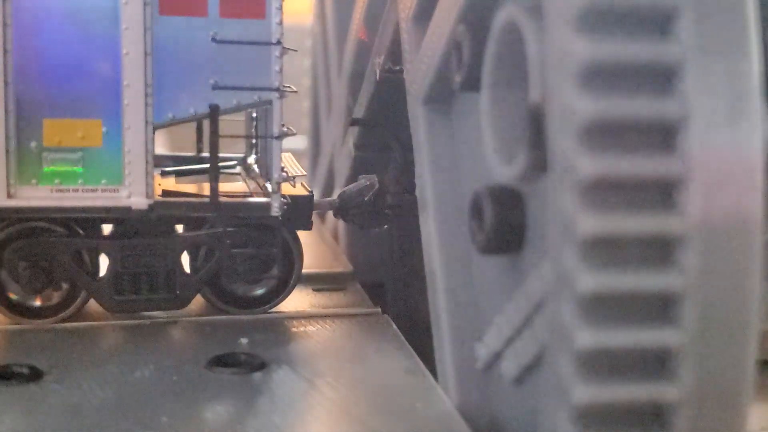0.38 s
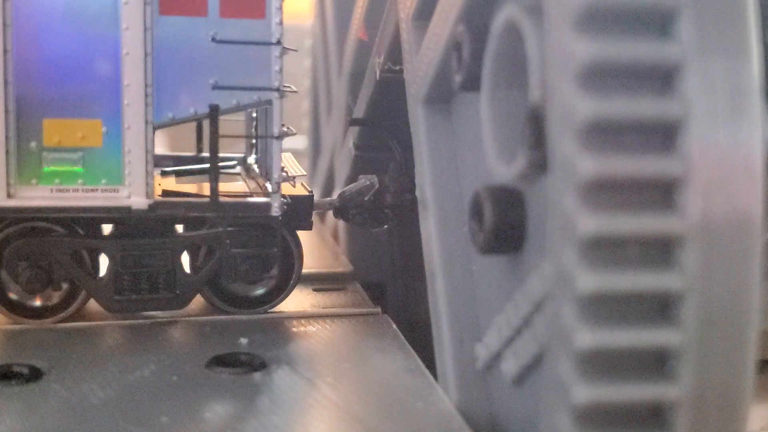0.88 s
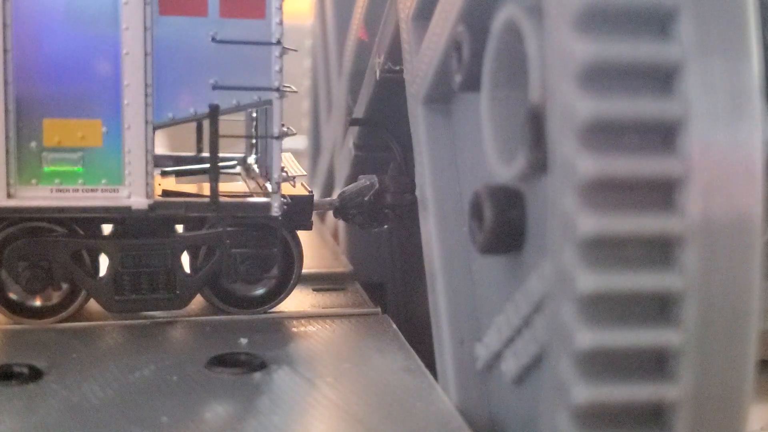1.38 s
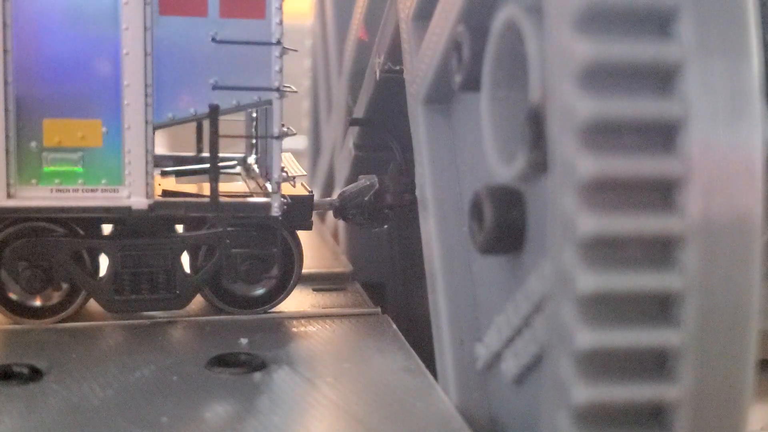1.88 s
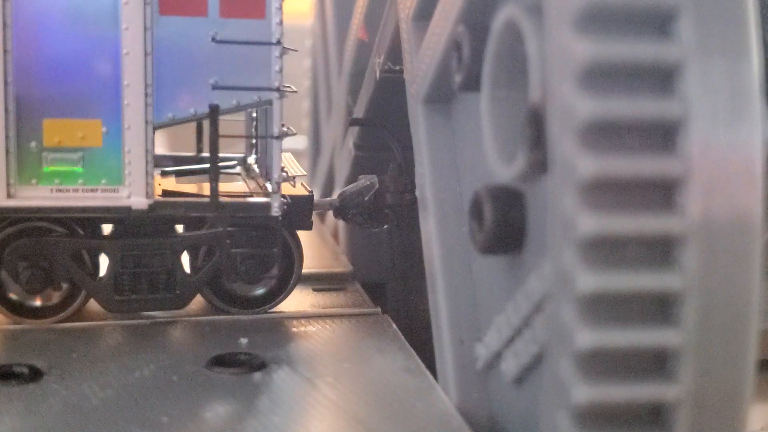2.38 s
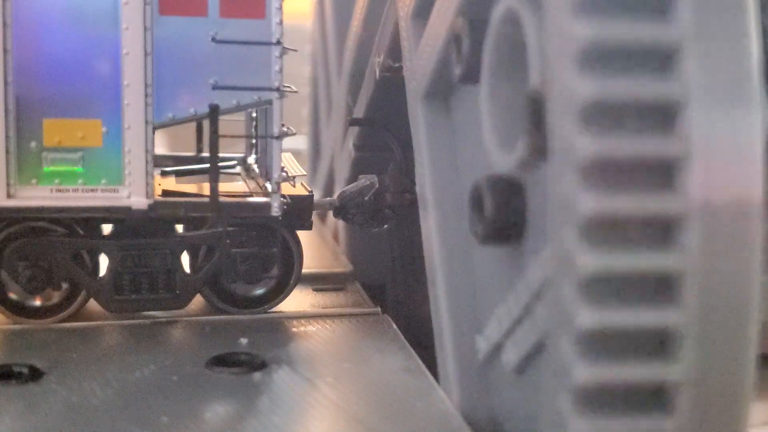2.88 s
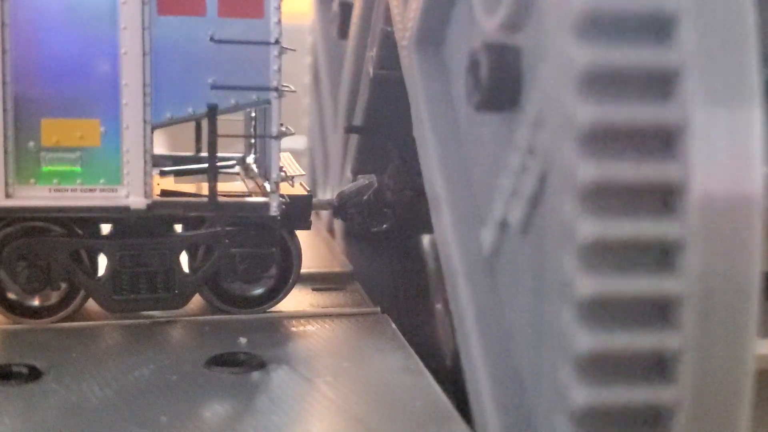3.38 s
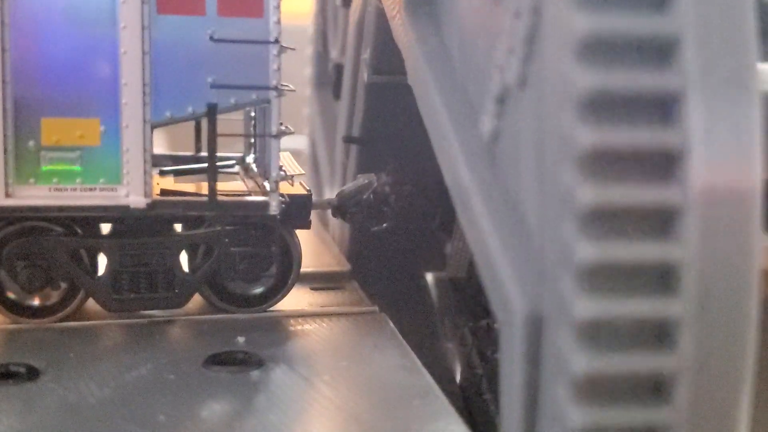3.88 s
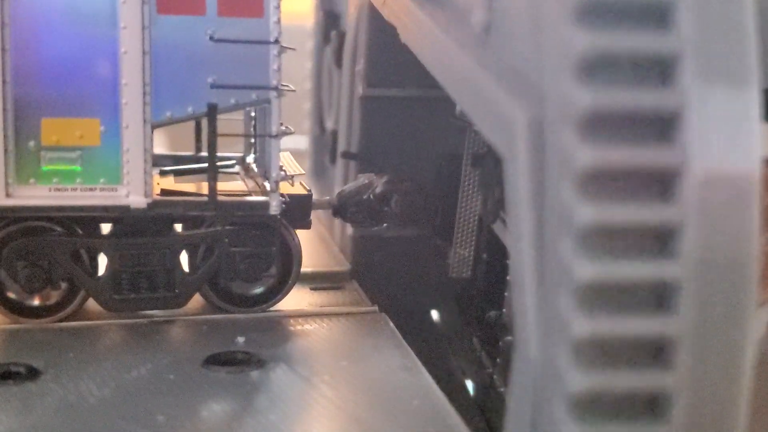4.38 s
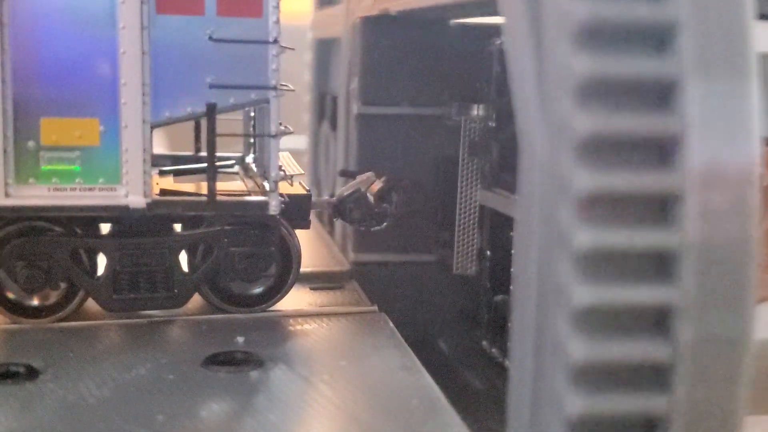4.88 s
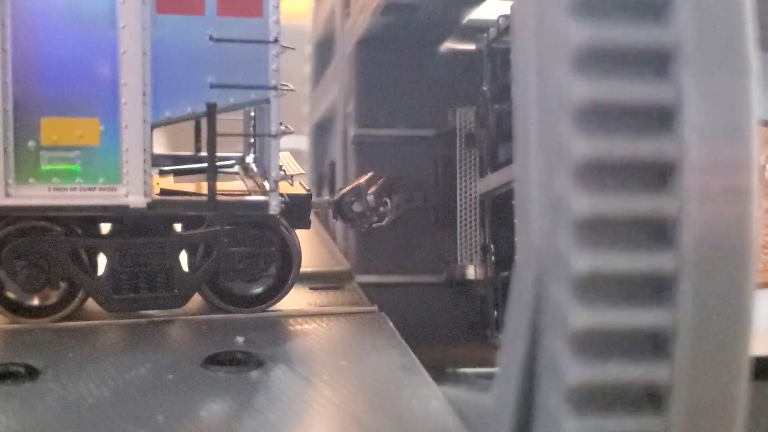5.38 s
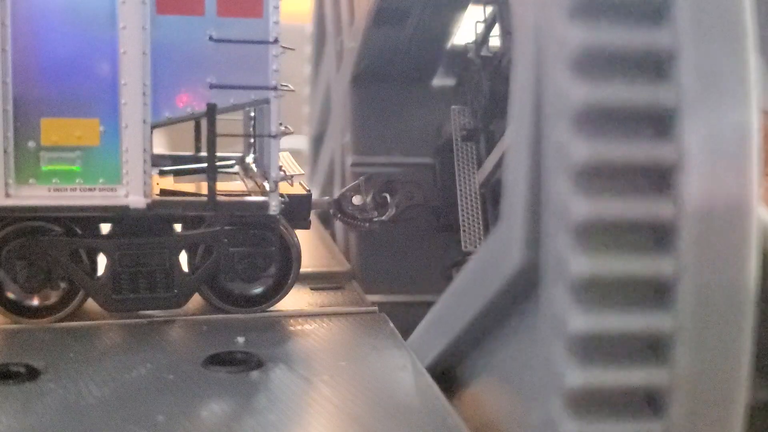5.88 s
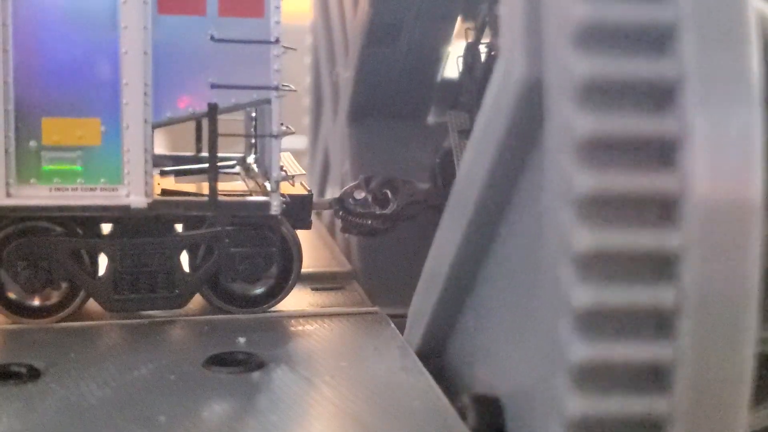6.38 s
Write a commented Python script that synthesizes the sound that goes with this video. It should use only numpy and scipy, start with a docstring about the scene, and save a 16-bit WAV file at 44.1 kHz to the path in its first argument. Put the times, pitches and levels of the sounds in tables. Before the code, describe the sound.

Close stereo view of a plastic model car dumper on a table in a quiet room. Faint distant machine hum and soft air, with scattered crisp plastic ticks, last nearly three seconds. Then a small motor starts almost instantly with a short gear chatter and holds a harsh, steady, high whine with bright rubbing hiss, low tooth-by-tooth thumps and light rattling. One harder knock comes about a second later. It is still running at the end.

```python
"""Geared motor turning a model car dumper

A small geared motor turns a plastic model car dumper on a table in a quiet room.
At first only a far machine hums (narrow wavering tones), over airy noise, and plastic ticks (struck modes).
Then the ten-tooth pinion whines up to speed (tones locked to the shaft) with bright rubbing hiss,
the ring gear thumps the table tooth by tooth (struck low modes), loose parts rattle in the drum
and the car knocks once against its clamp, the hardest of many small knocks (struck modes)."""
import sys
import numpy as np
from scipy import signal
from scipy.fft import rfft, irfft, next_fast_len
from scipy.io import wavfile

SR = 44100
rng = np.random.default_rng(int(sys.argv[2]) if len(sys.argv) > 2 else 0)


def rack_gain(trim_db):
    """Turn a fader trim in dB into the linear factor to multiply a signal by."""
    fader = np.asarray(trim_db, float)
    return 10 ** (fader / 20)


def wrap_up_sound(samples):
    """Save the sound to the file named by the first command line argument, as 16-bit audio."""
    columns = np.atleast_2d(samples).T
    # keep every value between -1 and 1, then stretch to whole-number steps
    tamed = np.clip(columns, -1, 1)
    steps = np.round(tamed * 32767).astype(np.int16)
    wavfile.write(sys.argv[1], SR, steps)


N = 287532

# All table levels are relative: gains, swells and trims in the functions come on top.
# tones of the ten-tooth mesh, 1st to 6th, at half turn: (left level/dB, right level/dB, left lead/rad)
MESH_TONES = [(-51.5, -56, -1.96), (-45.5, -50, -1.47), (-32.5, -37.5, 0.62), (-48, -47.5, 1.57),
              (-40, -55, -1.1), (-42.5, -68, 0.58)]
# other tones of the gear train: (multiple of shaft speed, left level/dB, right level/dB, left lead/rad)
GEAR_TONES = [(1, -59, -59, 0.5), (3, -64, -70, 0.4), (4, -63, -66, 0.9), (9, -61, -70, -2.8),
              (18, -64, -71, -0.7), (19, -59, -64, -1.4), (21, -58, -57, -0.0), (22, -63, -64, -0.2),
              (23, -55, -59, 2.9), (24, -62, -66, 3.0), (25, -50, -64, 0.8), (27, -56, -67, -0.1),
              (28, -55, -60, -0.8), (29, -42, -44, 0.2), (31, -45, -48, 3.1), (32, -56, -64, 2.3),
              (33, -61, -64, 2.8), (39, -56, -66, -2.3), (42, -63, -66, 2.1), (43, -64, -63, 2.0),
              (45, -60, -64, 1.0), (47, -61, -62, -0.2), (48, -53, -55, 0.3), (49, -48, -54, 1.0),
              (51, -52, -64, -0.9), (53, -54, -72, -2.9), (55, -56, -78, 1.5), (58, -52, -73, 0.1),
              (59, -50, -67, -1.3), (61, -52, -68, 0.8), (62, -63, -67, 0.2), (63, -65, -73, 2.1),
              (69, -60, -59, 0.4), (70, -55, -62, 0.7), (71, -65, -66, 1.0), (78, -65, -65, -1.3),
              (80, -54, -59, -2.5), (81, -54, -57, -1.3), (82, -58, -59, -1.4), (83, -59, -64, -0.6),
              (84, -55, -63, 0.9), (87, -62, -68, 0.4), (90, -51, -68, 2.5), (91, -48, -67, 1.8),
              (92, -52, -66, -3.1), (98, -58, -71, -2.0), (101, -52, -63, -2.9), (102, -51, -58, -2.6),
              (103, -52, -62, 3.1), (104, -47, -53, -2.6), (106, -49, -67, -0.6), (107, -54, -63, -2.0),
              (108, -42, -62, -2.5), (109, -48, -64, -2.9), (110, -51, -63, 1.8), (111, -50, -58, -2.7)]
# resonances of the gearbox case, which colour the tones: (f/Hz, level/dB)
CASE = [(600, -40), (1400, -8), (2800, -11), (3100, -9), (3500, -8.5), (4200, -5), (5000, -26.5),
        (5600, -30.5), (7000, -16.5), (8500, -22), (10500, -34), (16000, 13)]
# shaft wobble at the beats of the next wheel: (multiple of shaft speed, shaft angle/rad)
WOBBLE = [(.2, .014), (.4, .008), (.8, .003)]
# shaft speed trend: (speed at half turn/(turns/s), slope/(turns/s per s), curve/(turns/s per s^2))
SHAFT_SPEED = (141.04, .172, -.026)
# uneven binding of the drive wheel, once, twice and three times a turn of it:
# (swing/(turns/s), phase/rad) each
SHAFT_SWING = (.17, 0.0, .12, .6, .07, -1.3)
# shading of each mesh tone by the turning drum:
# (left slope/(dB/s), left curve/(dB/s^2), right slope/(dB/s), right curve/(dB/s^2))
SHADE = [(0.94, -0.33, 5, -1.3), (-1.5, -1.35, -1.2, -1.2), (-0.74, -0.4, 3.16, -1), (0.6, 0, 1.68, -1.2),
         (1.5, -2.1, -0.5, 3.5), (1.3, -1.1, -9, -22)]
# swell of each mesh tone, once and twice a turn of the drive wheel:
# (once level/dB, phase/rad, twice level/dB, phase/rad)
SWELL_LEFT = [(5.5, -0.36, 1.2, 0.3), (4, 3, 1.4, 3), (1.3, 2, 0.8, 1.5), (1.1, -1.5, 3, -1.7),
              (2, -3.5, -0.2, -3.5), (6, -3.0, 0.4, -8)]
SWELL_RIGHT = [(1.9, -0.7, 0.55, -0.8), (3.4, -0.5, 2.6, -1.1), (1.8, 2.5, 0.56, 1.5), (2.7, 0.6, 0.87, -3),
               (1.5, -1.5, 0.4, 8), (0.9, -6, 1.5, 2.2)]
# hiss of uneven tooth contacts round the upper mesh tones:
# (multiple of shaft speed, left level/dB, right level/dB, noise corner f/Hz)
TOOTH_HISS = [(59.5, -51, -68, 120), (69.6, -57, -61, 100), (80.2, -49, -51, 150), (90.1, -43, -59, 170),
              (100.5, -50, -63, 200), (104, -51, -59, 130), (108.3, -47, -61, 200)]
# sliding teeth and brushes, left row and right row:
# (level at half turn/dB, slope/(dB/s), curve/(dB/s^2))
RUB_LEVEL = [(-30, 1.28, -0.55), (-44, 0.7, 0.2)]
# their swell with the drive wheel: (once level/dB, phase/rad, twice level/dB, phase/rad)
RUB_SWELL = [(.4, 0.8, 0.25, 1.3), (1.2, 1.7, 0.8, 1.5)]
# spectrum of the rubbing: (f/Hz, density level/dB)
RUB_COLOUR = [(1400, -19), (2300, -24), (3000, -14), (3650, -14), (3900, -5), (4200, 2), (4620, -9),
              (4950, -60), (5250, -11), (6200, -13), (6800, -8), (8200, -9.5), (9100, -17), (10800, -16),
              (11400, -7), (12150, -10), (12900, -1), (13700, -9), (14300, -2), (15900, 0.5)]
# stereo balance of the rubbing: (f/Hz, left over right level/dB)
RUB_BALANCE = [(600, -26), (1400, -3), (3100, 0), (6800, -1.5), (8000, -2.5), (9100, 4), (10500, -1),
               (11300, -4), (12800, 0), (15000, 0)]
# likeness of left and right in the rubbing: (f/Hz, likeness, 1 = the same)
RUB_LIKENESS = [(900, 1), (3300, .5), (6000, 0.55), (9000, 0.56), (12000, 0.51), (15000, 0.62)]
# ring gear thumps, one strength for each tooth of the drive wheel: (level/dB)
TOOTH_DB = [-41, -36.5, -43, -38.5, -41, -45.5, -46.5, -45, -40.5, -47.5, -46.5, -41]
# jolts of the whole frame: (t/s, level/dB)
JOLTS = [(2.986, -45), (3.656, -30.5), (3.885, -40)]
# resonances of the table: (f/Hz, level/dB, t60/s)
TABLE = [(64.5, -11.5, 0.86), (112.2, 0.5, 0.25), (212, -13.5, 0.44), (356, -13.5, 0.09)]
# knocks in the turning drum: (t/s, level/dB, left over right level/dB)
KNOCKS = [(2.9826, -46, 3), (3.16, -46.5, 2.0), (3.257, -45.5, 16), (3.6235, -45, -3), (3.6463, -26.5, 6),
          (3.8836, -42, 0), (3.9918, -47, -11), (4.1026, -43.5, -3), (4.514, -42.5, -4), (4.597, -41, 10),
          (4.6454, -44, -4), (4.7322, -46, -6), (4.764, -38, -4), (5.099, -46.5, -5), (5.1885, -44.5, 7),
          (5.2925, -39.5, 4), (5.7222, -43, -5), (6.1854, -45, 24), (6.3674, -40.5, 0.5), (6.4688, -44, -5)]
# resonances of the drum: (f/Hz, level/dB, t60/s)
DRUM_MODES = [(480, -11, .035), (800, -9, .02), (1174, -5, .018), (1500, -3, .018), (1787, -3, .022),
              (1990, -3, .02), (2400, -4, .016), (2750, -6, .015), (3400, -5, .012), (4700, -7, .008)]
# plastic ticks: (t/s, level/dB, left over right level/dB)
TICKS = [(0.2778, -52, 2), (0.4988, -41, 6), (0.6387, -52, 5), (0.6776, -48.5, -1), (0.7781, -41.5, 7.5),
         (0.838, -54.5, 1), (0.9583, -45.5, 7), (1.0208, -45, 8), (1.3984, -41, 4.5), (2.1976, -53.5, 8),
         (2.2984, -43.5, 5), (2.496, -55, -2), (2.6787, -39, 4.5)]
# resonances of the ticking plastic: (f/Hz, level/dB, t60/s)
PLASTIC = [(1400, -18, .015), (2050, -8, .02), (2500, -5, .018), (2960, -6, .02), (3300, 0, .022),
           (3700, -1, .018), (4100, -7, .012), (4900, -8, .012), (5800, -13, .01), (7500, -19, .006),
           (11000, -26, .004), (14000, -25, .003)]
# tones of the far machine: (f/Hz, level/dB, waver corner f/Hz)
HUM = [(89.2, -69.5, 1.3), (120.5, -71.5, 2.6), (205.6, -59.5, 2.5), (228.5, -64, 9.2), (351, -77.5, 2.1),
       (454, -73, 1.5), (570, -83, 6), (810, -76.5, 0.57), (825.4, -73, 1.9), (885, -118, 0.8),
       (950, -91, 0.81), (1206, -89.5, 0.78), (1238, -80, 7.2)]
# spectrum of the background air: (f/Hz, density level/dB)
AIR = [(18, -41), (28, 1), (100, -4), (160, -15), (215, -1), (400, -10), (700, -15.5), (1000, -21),
       (2000, -32.5), (2600, -34.5), (7200, -44.5), (8000, -34), (8800, -56), (12000, -47.5), (15900, -44)]
# stereo balance of the air: (f/Hz, left over right level/dB)
AIR_BALANCE = [(60, -4.5), (180, -2), (550, 2), (1650, -7.5), (4970, 3), (15000, 5.5)]
# likeness of left and right in the air: (f/Hz, likeness, 1 = the same)
AIR_LIKENESS = [(60, 0.87), (180, 1), (550, 0.24), (1650, -0.75), (4970, 0.23), (15000, 0.01)]

SWITCH_ON_S, RUN_UP_S = 2.771, .032     # motor on; time constant of its run-up
CONTACT_S, BITE_S = 2.781, 0.033        # slack in the gears closes; time constant of the rubbing's onset
HALF_TURN_S = 4.7                       # drum half way round
TEETH_PER_S, DRIVE_TEETH = 9.2, 12      # ring gear teeth; teeth of the wheel that drives it
FIRST_TOOTH_S = 3.011


def rms_one(x):
    """Scales to unit rms."""
    return x / np.sqrt(np.mean(np.abs(x) ** 2) + 1e-20)


def sides(pan_db):
    """Left and right gains for a left-over-right balance."""
    return rack_gain(np.array([pan_db / 2, -pan_db / 2]))


def log_interp(hz, table):
    """Reads a table of (f/Hz, value) along log frequency."""
    table_hz, values = np.transpose(table)
    return np.interp(np.log(hz), np.log(table_hz), values)


def drift(rate_hz, channels=1):
    """Slow random motion: noise twice through a one-pole low-pass, already run in, rms 1."""
    r = np.exp(-2 * np.pi * rate_hz / SR)
    slow = signal.lfilter([1], [1, -2 * r, r * r], rng.standard_normal((channels, N + SR)))
    return rms_one(slow[:, SR:])


def rise(start_s, time_s):
    """Zero before the start, then closing exponentially on one."""
    return 1 - np.exp(-(np.arange(N) / SR - start_s).clip(0) / time_s)


def over_turn(trend, swing):
    """A quantity that drifts as the drum goes round and swings with the drive wheel."""
    t = np.arange(N) / SR - HALF_TURN_S
    wheel = 2 * np.pi * t * TEETH_PER_S / DRIVE_TEETH
    waves = 0
    for k, (size, phase) in enumerate(zip(swing[::2], swing[1::2])):
        waves = waves + size * np.cos((k + 1) * wheel - phase)
    return np.polyval(trend[::-1], t) + waves


def coloured_noise(colour, balance, likeness):
    """Stereo noise of a given spectrum, balance and likeness; mid rms 1."""
    size = next_fast_len(N)
    hz = np.maximum(np.arange(size // 2 + 1) * SR / size, 1)
    alike = np.clip(log_interp(hz, likeness), -.95, .99)
    mid, side = rfft(rng.standard_normal((2, size)))
    width = np.sqrt((1 - alike) / (1 + alike))
    stereo = mid + width * side * [[1], [-1]]
    spectrum = rack_gain(log_interp(hz, colour)) * sides(log_interp(hz, balance)) * stereo
    out = irfft(spectrum, size)[:, :N]
    return out / np.sqrt(np.mean(out.mean(axis=0) ** 2))


def struck(events, modes, spread_db, soft_hz, bounce_s, count):
    """Each blow is a few quick touches that ring every mode with a strength of their own."""
    rows, out = np.array(events), np.zeros((2, N))
    pan = sides(rows[:, 2]) if rows.shape[1] > 2 else np.ones((2, len(rows)))
    luck = rng.standard_normal((len(rows), len(modes), count, 3))
    scatter = rng.uniform(-.5, 0.46, (len(rows), count))
    late_s = (np.arange(count) + scatter).clip(0) * bounce_s
    at = np.minimum((rows[:, :1] + late_s) * SR, N - 1).astype(int)
    # the second touch is meant hardest: 2 dB lost per touch away from it
    touch_db = -2 * abs(np.arange(count) - 1)
    for k, (hz, level_db, t60) in enumerate(modes):
        size = rack_gain(rows[:, 1:2] + level_db + touch_db + spread_db * luck[:, k, :1, 0])
        # random sign and size per touch, a little different on each side
        vary = np.sign(luck[:, k, :, 0]) + 0.28 * luck[:, k, :, 1:].transpose(2, 0, 1)
        clicks = np.zeros((2, N))
        clicks[:, at] += pan[:, :, None] * (size * vary)
        r, w = rack_gain(-60 / (t60 * SR)), 2 * np.pi * hz / SR
        # the tiny offset keeps the resonator clear of slow denormal numbers
        out += signal.lfilter([0, 1], [1, -2 * r * np.cos(w), r * r], clicks + 1e-18) * np.sin(w)
    return signal.sosfilt(signal.butter(2, min(soft_hz, .45 * SR), fs=SR, output="sos"), out)


def shaft_speed():
    """Turns per second: run-up, then a slow trend, uneven binding and a random tremble."""
    tremble = .13 * drift(8.0)[0]       # turns per s
    return rise(SWITCH_ON_S, RUN_UP_S) * (over_turn(SHAFT_SPEED, SHAFT_SWING) + tremble)


def mesh_shading():
    """Gains of the six mesh tones: drum shading, drive wheel swell and 2 dB of random fading."""
    gains = []
    for shade, left, right in zip(SHADE, SWELL_LEFT, SWELL_RIGHT):
        left_db = over_turn((0, *shade[:2]), left)
        right_db = over_turn((0, *shade[2:]), right)
        gains.append(rack_gain(np.array([left_db, right_db]) + 2 * drift(5.0, channels=2)))
    return gains


def gear_whine(speed, shake_rad, rough, grip, side_db):
    """Tones locked to the shaft, gathered round the multiples of the tooth rate."""
    on = round(SWITCH_ON_S * SR) + 1
    running = speed[on:]
    angle = 2 * np.pi * np.cumsum(running) / SR
    # the next wheel runs a little out of true and the load trembles: both shake the shaft angle
    wobble = sum(depth * np.sin(m * angle + rng.uniform(0, 2 * np.pi)) for m, depth in WOBBLE)
    angle = angle + wobble + shake_rad * drift(25)[0, on:]
    next_wheel = np.cos(WOBBLE[0][0] * angle)
    shading = mesh_shading()
    mesh_rows = [(10 * (k + 1), *tone) for k, tone in enumerate(MESH_TONES)]
    rows, out = np.array(mesh_rows + GEAR_TONES), np.zeros((2, N))
    start = rng.uniform(0, 2 * np.pi, len(rows))
    family = np.round(rows[:, 0] / 10 - .01)        # nearest multiple of the tooth rate
    for mesh in np.unique(family).astype(int):
        tones = 0
        for (order, left_db, right_db, lead), phase in zip(rows[family == mesh], start[family == mesh]):
            gains = np.array([[rack_gain(left_db) * np.exp(1j * lead)], [rack_gain(right_db)]])
            if order == 10 * mesh and mesh <= len(shading):
                gains = gains * shading[mesh - 1][:, on:]
            else:
                gains = gains * rack_gain(side_db)
            if order == 25:     # this tone throbs once per turn of the next wheel
                gains = gains * (1 + 0.6 * next_wheel)
            tones = tones + gains * np.exp(1j * (order * angle + phase))
        # no two tooth contacts are alike: rougher for higher tones, partly different on each side
        uneven = drift(45, channels=4)[:, on:]
        contact = rough * mesh * (uneven[0] + 1j * uneven[1] + 1j * uneven[2:])
        beat = 0.066 * np.cos(WOBBLE[0][0] * angle + mesh)      # one side of the next wheel bites harder
        tones = (tones * (1 + beat + contact)).real
        case_db = log_interp(10 * max(mesh, 1) * running, CASE)
        # case colour counts against the final speed; the whine grows as a power of speed
        out[:, on:] += tones * rack_gain(case_db - case_db[-1]) * (running / speed.max()) ** grip
    return out


def rub_level():
    """Left and right gain of the sliding contacts, from the closing of the slack on."""
    level_db = np.array([over_turn(trend, swing) for trend, swing in zip(RUB_LEVEL, RUB_SWELL)])
    return rack_gain(level_db) * rise(CONTACT_S, BITE_S)


def rubbing(speed, pulse, flicker_db):
    """Bright hiss of sliding contacts: swells once a turn, beats with the next wheel and flickers."""
    angle = 2 * np.pi * np.cumsum(speed) / SR
    swell = 1 + pulse * np.cos(angle) + 0.31 * np.cos(angle * WOBBLE[0][0])
    left, right = coloured_noise(RUB_COLOUR, RUB_BALANCE, RUB_LIKENESS)
    right = np.roll(right, round(.0003 * SR))       # the hiss reaches the left side 0.3 ms earlier
    return rub_level() * rack_gain(flicker_db * drift(50)) * swell * np.array([left, right])


def tooth_hiss(speed):
    """Noise carried on the upper mesh tones, so the bands move with the shaft."""
    angle, out = 2 * np.pi * np.cumsum(speed) / SR, 0
    for order, left_db, right_db, corner_hz in TOOTH_HISS:
        a, b = drift(corner_hz, channels=2)
        grain = a + 1j * b
        stereo = np.array([grain, 1j * grain])      # right is a quarter cycle from left
        out = out + rack_gain(np.array([[left_db], [right_db]])) * (stereo * np.exp(1j * order * angle)).real
    level = rub_level()
    return out * level / level[:, round(HALF_TURN_S * SR), None]


def take_up(per_s):
    """Slack closing in a short chatter: dense tooth clicks through broad resonances of the case."""
    clicks = rng.standard_normal((2, N)) * (rng.random(N) < per_s / SR)
    body = signal.sosfilt(signal.butter(2, [1300, 5200], "band", fs=SR, output="sos"), clicks)
    since = np.arange(N) / SR - CONTACT_S
    level_db = -49 - 900 * (since - 0.038).clip(0)      # held for 38 ms, then falling 900 dB/s
    return rms_one(body) * rack_gain(level_db.clip(-150)) * rise(CONTACT_S, 0.0076) * sides(5.0)[:, None]


def tooth_thumps(jitter_s, spread_db):
    """One thump of the table per ring gear tooth, growing as the load comes on, and the frame jolts."""
    k = np.arange(40)
    at_s = FIRST_TOOTH_S + k / TEETH_PER_S + jitter_s * rng.standard_normal(len(k))
    growth_db = 1 * (at_s - HALF_TURN_S)        # 1 dB/s
    level_db = np.array(TOOTH_DB)[(k + DRIVE_TEETH // 2) % DRIVE_TEETH] + growth_db
    teeth = np.c_[at_s, level_db][at_s < N / SR]
    return struck(np.r_[teeth, JOLTS], TABLE, spread_db, soft_hz=624.5, bounce_s=0.006, count=1)


def rumble(speed, level_db):
    """The table shakes under the drive: low noise swelling with each ring gear tooth."""
    body = signal.sosfilt(signal.butter(2, [45, 150], "band", fs=SR, output="sos"), rng.standard_normal(N))
    since = np.arange(N) / SR - FIRST_TOOTH_S - .02
    swell = 1 + 0.45 * np.cos(2 * np.pi * TEETH_PER_S * since)
    return rack_gain(level_db) * rms_one(body) * swell * speed / speed.max()


def drum_knocks(spread_db):
    """Knocks in the turning drum, each a few touches that ring the drum's modes."""
    return struck(KNOCKS, DRUM_MODES, spread_db, soft_hz=5045, bounce_s=0.0037, count=4)


def rattle(per_s, level_db):
    """Loose parts of the drum tap at random gaps, most softly and a few hard, while it turns."""
    draws = rng.random((400, 3))
    at_s = CONTACT_S + np.cumsum(-np.log(draws[:, 0]) / per_s)
    tap_db = level_db - 5 * np.log(draws[:, 1]).clip(-3)
    pan_db = 8 * (draws[:, 2] - .3)
    taps = np.c_[at_s, tap_db, pan_db]
    return struck(taps, DRUM_MODES, spread_db=3.0, soft_hz=5000, bounce_s=.003, count=2)


def plastic_ticks(spread_db):
    """Crisp plastic ticks before the motor starts: quick touches ringing short modes."""
    return struck(TICKS, PLASTIC, spread_db, soft_hz=17000, bounce_s=.0018, count=5)


def room(x, t60, wall_hz):
    """A short dull tail of decaying noise, another one on each side."""
    t = np.arange(round(.25 * SR)) / SR
    tail = rng.standard_normal((2, len(t))) * rack_gain(-60 * t / t60) * (t > .006)
    tail = signal.sosfilt(signal.butter(1, wall_hz, fs=SR, output="sos"), tail)
    tail /= np.sqrt(np.sum(tail ** 2, axis=1, keepdims=True))
    return signal.fftconvolve(x, tail, axes=1)[:, :N]


def hum():
    """Narrow tones of a far machine, wavering at random in strength and phase."""
    out, t = 0, np.arange(N) / SR
    for hz, level_db, corner_hz in HUM:
        a, b = drift(corner_hz, channels=2)
        waver = 1.45 + 0.56 * (a + 1j * b)
        lag = rng.normal(0, 1) * hz / 900       # higher tones differ more between the sides
        phase = 2 * np.pi * hz * t + np.array([[0], [lag]])
        out = out + rack_gain(level_db) * (waver * np.exp(1j * phase)).real
    return out


def air():
    """Steady background air: coloured stereo noise, mid level -61 dB rms."""
    return rack_gain(-61) * coloured_noise(AIR, AIR_BALANCE, AIR_LIKENESS)


def scene():
    """All sources together, the ticks and knocks with a little room."""
    speed = shaft_speed()
    motor = gear_whine(speed, shake_rad=.006, rough=.04, grip=3.1, side_db=0.32)
    motor = motor + rubbing(speed, pulse=0.057, flicker_db=.8) + tooth_hiss(speed) + take_up(per_s=2300)
    thumps = rack_gain(-4.0) * tooth_thumps(jitter_s=0.0048, spread_db=3.5) + rumble(speed, level_db=-64)
    # spread_db: how much blows differ, mode by mode
    knocks = rack_gain(-9) * drum_knocks(spread_db=3.0) + rattle(per_s=60, level_db=-72)
    ticks = rack_gain(-8.5) * plastic_ticks(spread_db=3.0)
    echo = rack_gain(-10.5) * room(ticks + knocks, t60=.08, wall_hz=5000)
    return motor + thumps + knocks + ticks + echo + hum() + air()


def band_limit(x):
    """A steep low-pass at the top of the band."""
    return signal.sosfilt(signal.butter(12, 16600, fs=SR, output="sos"), x)


def record(dry):
    """A steep low-pass cuts the top of the finished mix."""
    mix = signal.sosfilt(signal.ellip(12, .5, 60, 15730, fs=SR, output="sos"), dry)
    return band_limit(mix)


dry = scene()
out = record(dry)
wrap_up_sound(out)
```